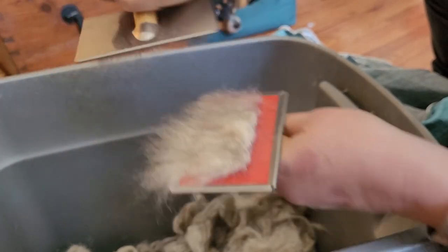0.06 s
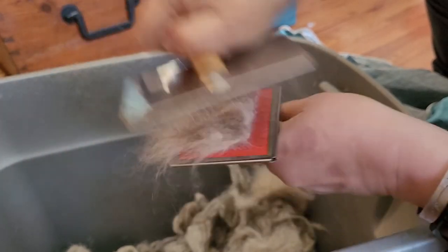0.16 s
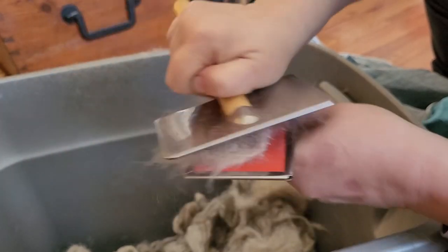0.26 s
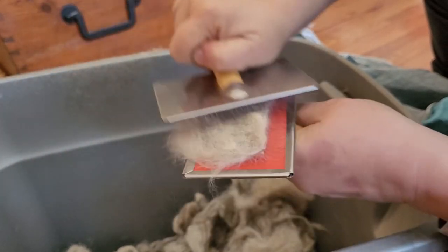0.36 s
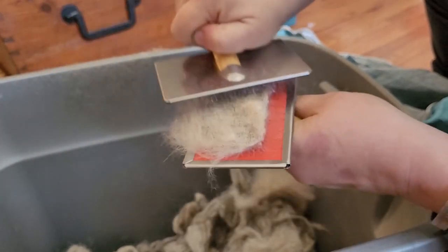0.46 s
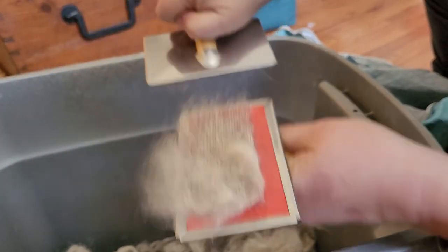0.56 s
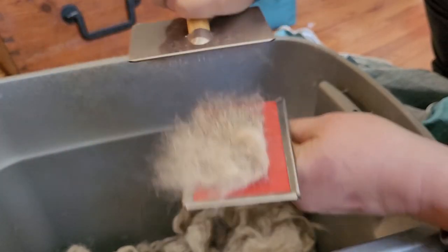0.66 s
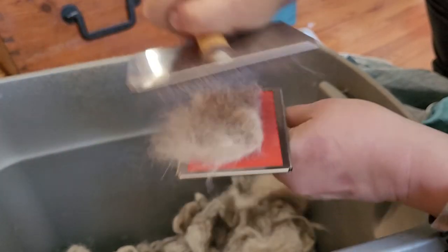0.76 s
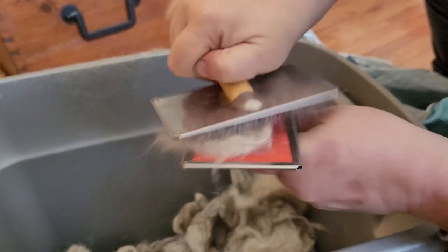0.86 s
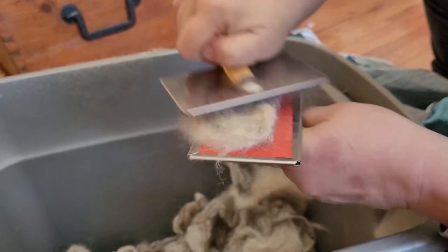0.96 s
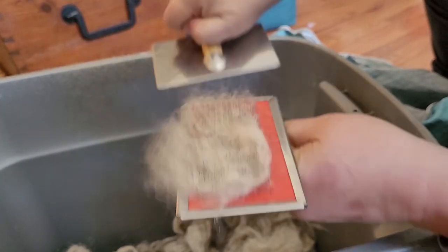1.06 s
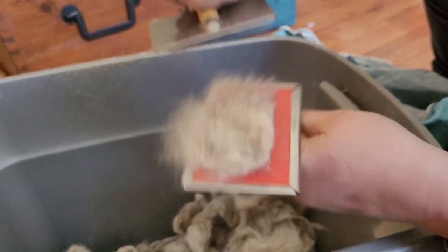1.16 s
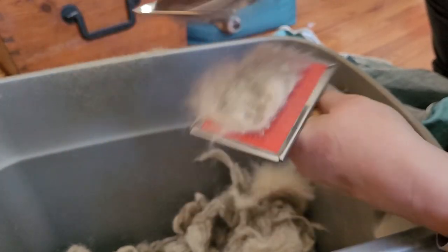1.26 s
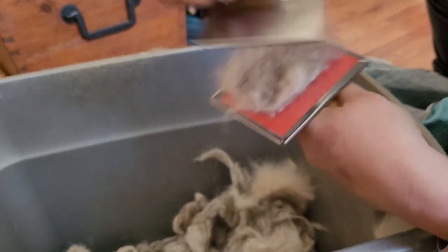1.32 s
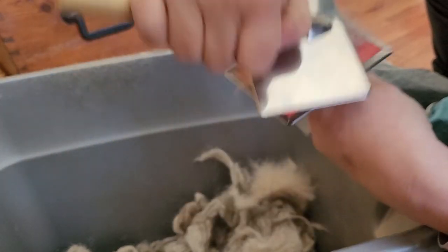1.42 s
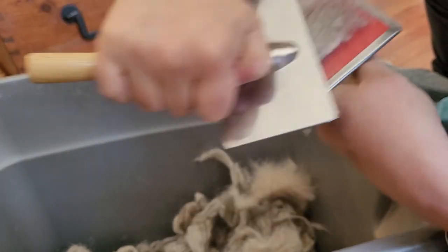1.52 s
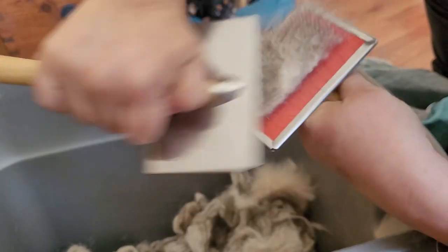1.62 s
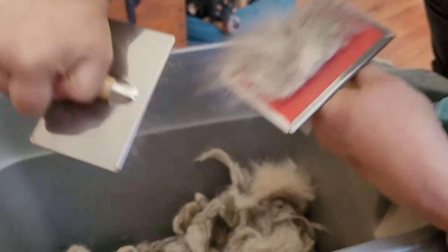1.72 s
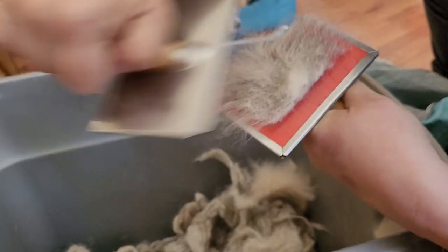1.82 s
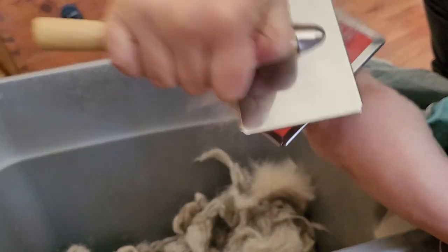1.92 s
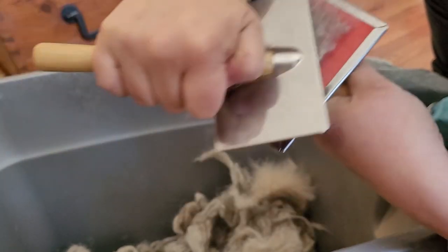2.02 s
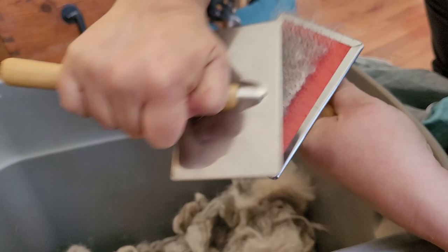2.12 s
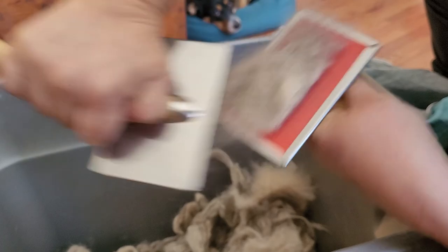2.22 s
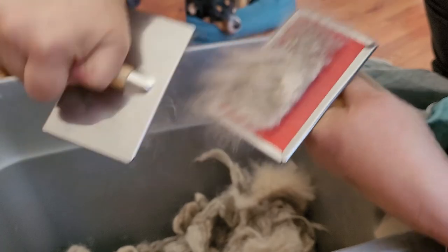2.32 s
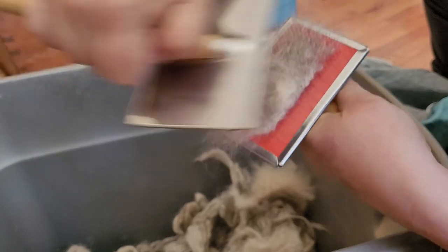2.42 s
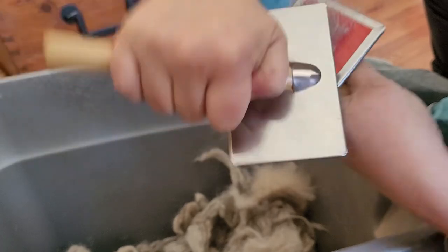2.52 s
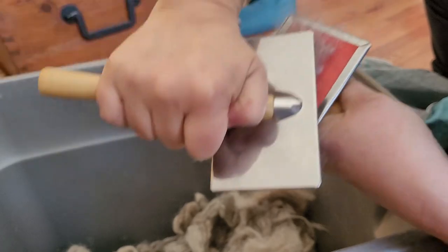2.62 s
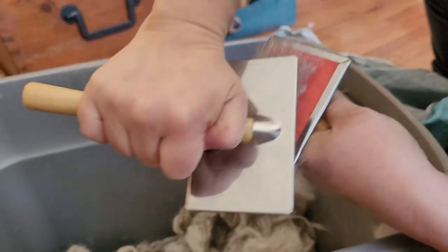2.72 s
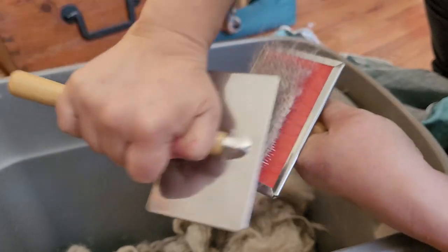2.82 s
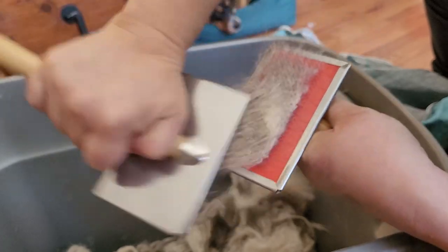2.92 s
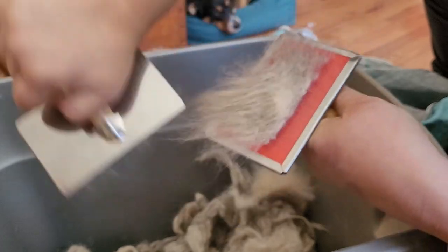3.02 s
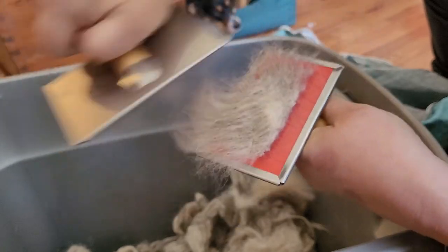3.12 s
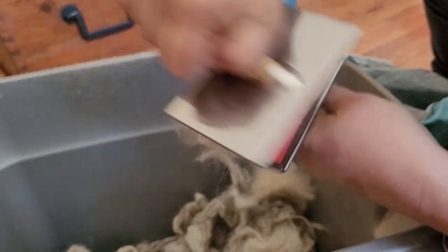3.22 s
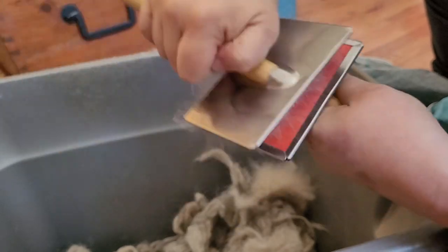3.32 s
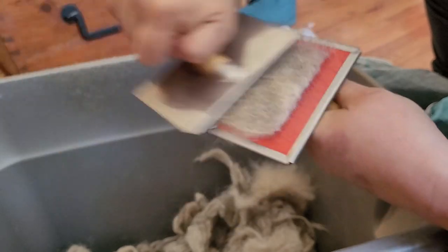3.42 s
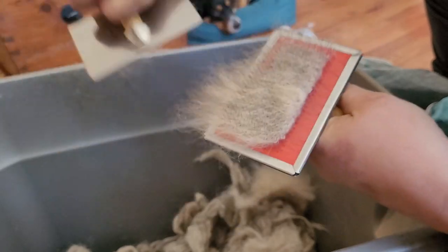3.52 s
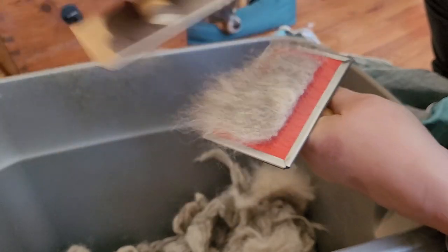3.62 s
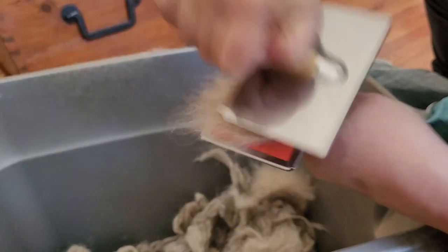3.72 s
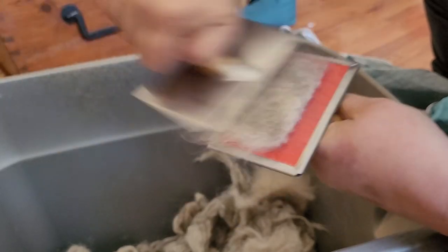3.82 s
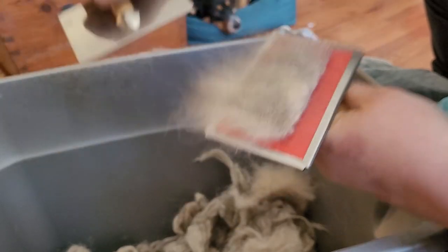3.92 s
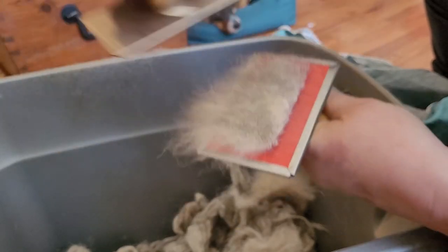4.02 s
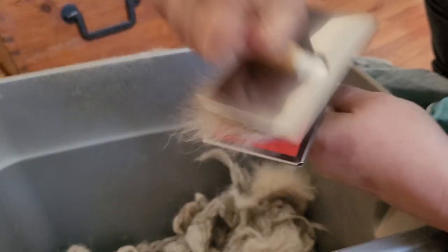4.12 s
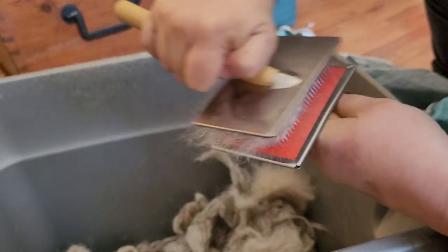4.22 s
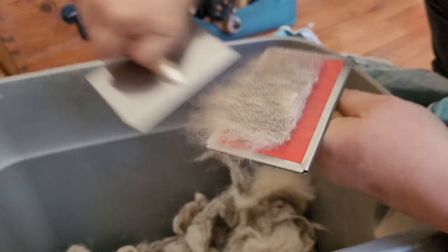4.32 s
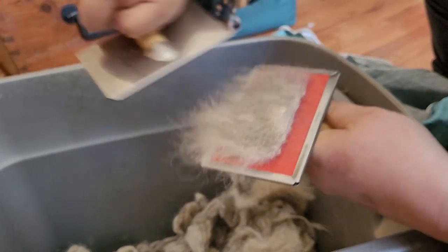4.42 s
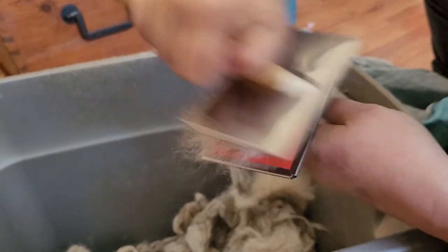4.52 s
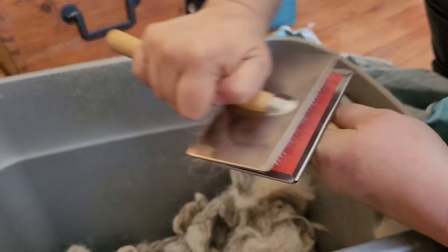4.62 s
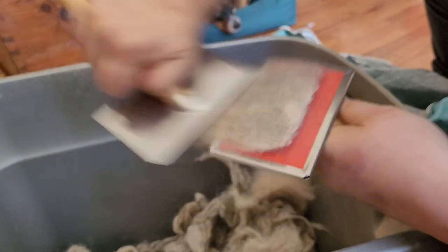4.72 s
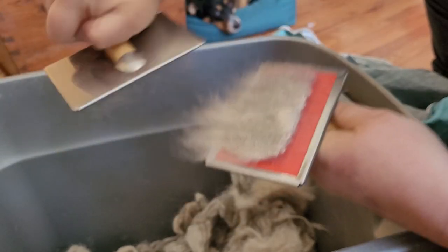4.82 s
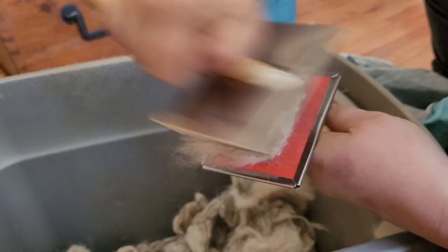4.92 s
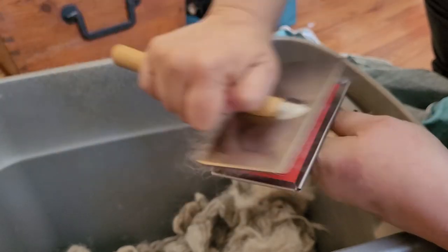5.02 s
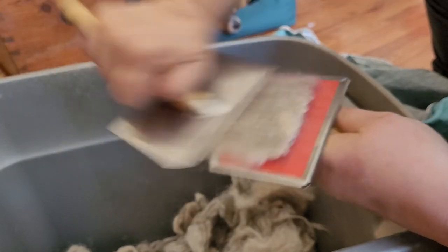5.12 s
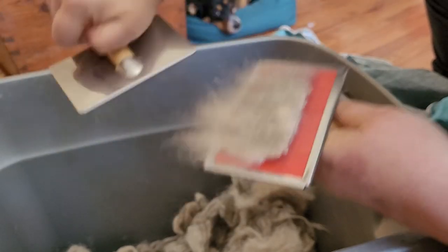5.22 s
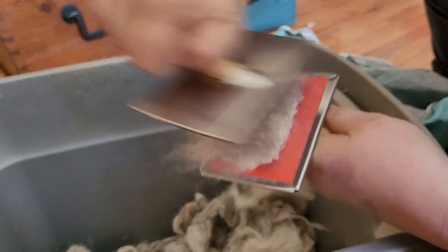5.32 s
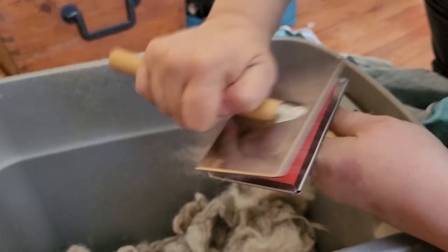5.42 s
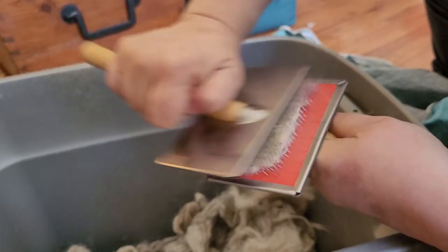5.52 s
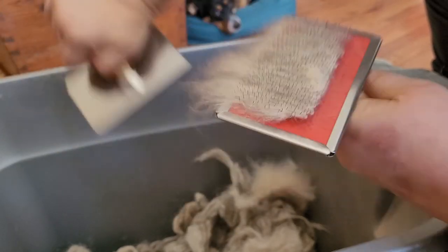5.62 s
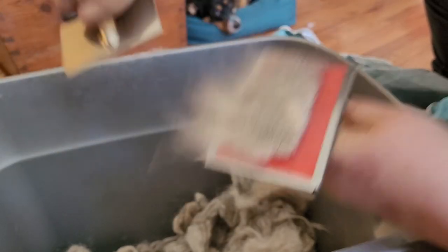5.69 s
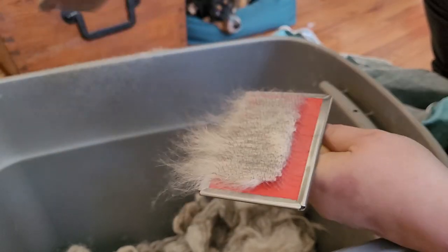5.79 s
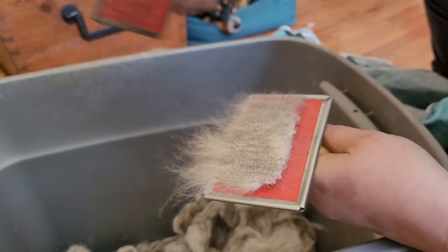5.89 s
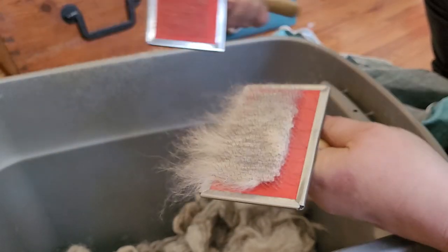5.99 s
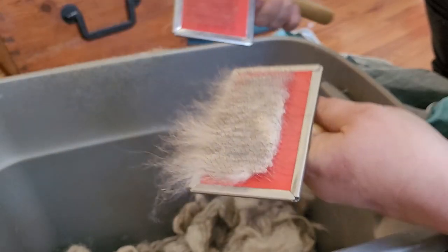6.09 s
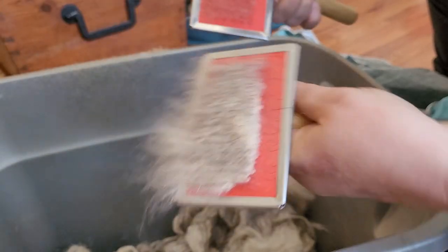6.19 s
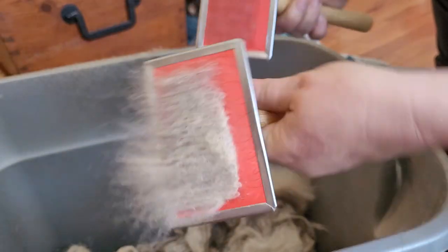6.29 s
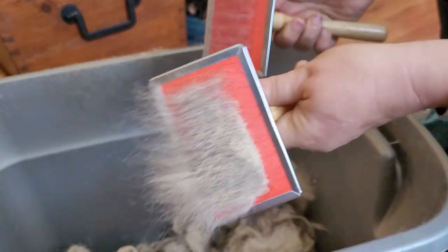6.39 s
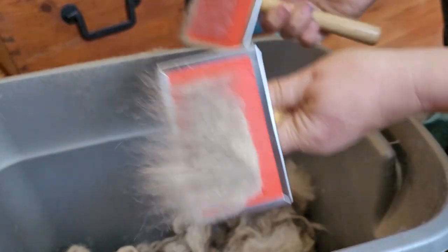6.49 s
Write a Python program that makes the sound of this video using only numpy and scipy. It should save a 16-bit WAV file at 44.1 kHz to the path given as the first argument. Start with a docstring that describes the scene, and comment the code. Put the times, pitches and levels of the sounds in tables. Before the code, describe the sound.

Two wire-toothed hand carders comb fur close to the microphone in a small, quiet room. About eleven strokes follow one another, each a light tap, a scratchy rasp and a bright flick as the teeth pull free. Early on, a plastic tub is bumped and booms briefly. Later strokes are quicker, some landing with a soft thud. After they stop come faint knocks, a soft palm rub and a few tiny wire pings.

```python
"""Two wire-toothed hand carders comb a tuft of fur over a plastic tub in a small, quiet room.
From 0.2 s come eleven strokes, the first catching halfway: the upper carder taps down, rasps through
the lower one, flicks free. The tub is bumped at 1.4 s and booms. After 3 s the hardest landings thud
in the wooden handles. The strokes end at 5.6 s; two faint knocks on the tub follow, a palm slides
on a handle, and single wires ping as the carders' edges graze each other."""
import sys
import numpy as np
from scipy import signal
from scipy.fft import rfft, irfft, next_fast_len
from scipy.io import wavfile
from scipy.ndimage import uniform_filter1d, map_coordinates

SR = 44100
rng = np.random.default_rng(int(sys.argv[2]) if len(sys.argv) > 2 else 0)


def materialize(psi):
    """Save the field psi as 16-bit PCM at rate SR to the path in sys.argv[1].

    A 1-D psi becomes a single channel; in a 2-D psi each row is a channel.
    """
    bounded = np.clip(np.atleast_2d(psi).T, -1, 1)
    quanta = np.round(bounded * 32767).astype(np.int16)
    wavfile.write(sys.argv[1], SR, quanta)


N = 288855
TIME = np.arange(N) / SR


def amp(db):
    """Decibels to gain."""
    return 10 ** (np.asarray(db) / 20)


def unit(x):
    """Scale to rms 1."""
    return x / np.sqrt(np.mean(x ** 2) + 1e-20)


def along(points, hz):
    """Read a curve of (Hz, value) points on a log frequency axis."""
    f, v = np.transpose(points)
    return np.interp(np.log(hz + 1), np.log(f + 1), v)


def lifts(modes, hz):
    """Bell EQ in dB from (centre Hz, width Hz, lift dB) rows."""
    return sum(db / (1 + (2 * (hz - centre) / width) ** 2) for centre, width, db in modes)


def filtered(x, response):
    """EQ x with a gain given as a function of frequency."""
    m = next_fast_len(x.shape[-1] + 8192)
    return irfft(rfft(x, m) * response(np.fft.rfftfreq(m, 1 / SR)), m)[..., :x.shape[-1]]


def ring(x, colour, modes=(), size=4096):
    """Play stereo x through a causal body of unit energy with this (Hz, dB) colour and these resonances."""
    hz = np.fft.rfftfreq(size, 1 / SR)
    cepstrum = irfft(np.log(amp(along(colour, hz) + lifts(modes, hz))))
    body = irfft(np.exp(rfft(2 * cepstrum * (np.arange(size) < size // 2))))
    return signal.oaconvolve(x, body[None] / np.linalg.norm(body), axes=1)[:, :x.shape[1]]


def ports(x, sides):
    """Pan each frequency between the left and right microphone ports."""
    def gains(hz):
        pair = amp(np.outer([.5, -.5], along(sides, hz)))
        return pair / np.sqrt(np.mean(pair ** 2, axis=0))
    return filtered(x, gains)


def add(track, s, sound):
    """Mix a sound into a track at s seconds."""
    rest = track[:, round(s * SR):]
    rest[:, :sound.shape[-1]] += sound[..., :rest.shape[1]]


def wobble(rate):
    """A smooth random curve with rate knots a second."""
    return map_coordinates(rng.standard_normal(int(N * rate / SR) + 4), [TIME * rate], order=2)


def patches(shape, bins, frames):
    """Random patches of rms 1, smooth over frequency and time."""
    across_bins = uniform_filter1d(rng.standard_normal(shape), bins, axis=0)
    return unit(uniform_filter1d(across_bins, frames, axis=1))


def swell(t, spread):
    """A peaked rise and fall around t = 0."""
    return np.exp(-np.abs(t / (2 * spread)) ** 1.66)


def swells(rows):
    """An envelope from (peak time s, dB, spread s) rows."""
    return sum(amp(db) * swell(TIME - s, spread) for s, db, spread in rows)


def struck(modes, t):
    """Decaying sines from (Hz, dB, t60 s) rows."""
    return sum(amp(db - 60 * t / t60) * np.sin(2 * np.pi * hz * t) for hz, db, t60 in modes)


def plucks(level, rate, scatter_db, lead_ms, width_ms):
    """Tiny random slips, up to rate a second; a harder pull frees more of them and makes each louder."""
    chance = np.clip(rate / SR * (level / level.max()) ** .4, 1e-6, 1)
    luck, size, place = rng.random(N), rng.standard_normal(N), rng.standard_normal(N)
    at = np.flatnonzero(luck < chance)
    strength = unit(amp(scatter_db * np.clip(size, -2, 2)))
    push = (strength * rng.choice([-1, 1], N) * level / np.sqrt(chance))[at]
    # each slip happens at its own spot, so it reaches the right port with its own delay
    delay = np.round((lead_ms + width_ms * place[at]) * SR / 1000).astype(int)
    late = np.clip(at + delay, 0, N - 1)
    return np.array([np.bincount(at, push, N), np.bincount(late, push, N)])


def crack(t60, rattle, lead_samples=3, size=2048):
    """One contact: a sharp push, first at the left port, and a short rattle."""
    burst = rng.standard_normal((2, size)) * amp(-60 * np.arange(size) / SR / t60)
    burst *= rattle / np.linalg.norm(burst, axis=1, keepdims=True)
    burst[[0, 1], [0, lead_samples]] += 1
    return burst / np.hypot(1, rattle)


# Room tone EQ. Each row: frequency in Hz, relative level in dB.
AIR_EQ = [(20, -18), (60, -9), (150, -8.5), (195, -12.5), (260, -6), (370, -10), (430, -3.5), (600, -9.5),
          (1350, -17.5), (1800, -25), (2300, -29.5), (3700, -35.5), (9000, -43), (16000, -46)]
# Hum and hiss bands. Each row: centre in Hz, width in Hz, lift in dB.
HUM_BANDS = [(160.8, 11, 10.5), (298, 24, 6), (430.8, 6.1, 10.5), (454.3, 4.8, 9), (528.3, 13, 8),
             (2760, 650, 7), (4740, 700, 4), (7270, 1230, 8.5), (11300, 1700, 11.5)]
# Stereo width of the air. Each row: frequency in Hz, left-right likeness (1 is mono).
AIR_LIKENESS = [(60, 0.82), (400, 0.85), (900, 0.31), (2000, 0), (8000, 0.021)]
# Pan of the air. Each row: frequency in Hz, left minus right in dB.
AIR_PAN = [(60, -1.5), (400, -1), (1300, 0), (2200, -1), (2900, 13), (3800, 2), (6000, 1.5), (7300, -2.5),
           (9000, -9), (11300, -11), (13500, -2), (16000, 7)]


def room_tone():
    """Room air with a low hum, nearly mono in the bass; its colour and level drift a little."""
    def mid_side_eq(hz):
        width = np.arccos(np.clip(along(AIR_LIKENESS, hz), -1, 1)) / 2
        return amp(along(AIR_EQ, hz) + lifts(HUM_BANDS, hz)) * [np.cos(width), np.sin(width)]
    spectrum = signal.stft(rng.standard_normal((2, N)), nperseg=1024)[2]
    drift_db = patches(spectrum.shape[1:], bins=8, frames=9)
    air = signal.istft(spectrum * amp(drift_db), nperseg=1024)[1][:, :N]
    mid, side = filtered(air, mid_side_eq)
    level = amp(-54.5 + 0.31 * wobble(7))
    return ports(level * unit(np.array([mid + side, mid - side])), AIR_PAN)


# The room's short decay. Each row: frequency in Hz, t60 in seconds.
ROOM_DECAY = [(200, 0.19), (1500, 0.17), (5000, 0.17), (15000, 0.12)]


def room_reverb(x, wet_db):
    """The small room answers, with a fresh tail every third of a second for the moving hands."""
    wet, block = np.zeros((2, N)), SR // 3
    for start in range(0, N, block):
        hz, t, noise = signal.stft(rng.standard_normal((2, block)), SR, nperseg=256)
        tail = signal.istft(noise * amp(-60 * t / along(ROOM_DECAY, hz)[:, None]), SR, nperseg=256)[1]
        tail /= np.linalg.norm(tail[0])
        add(wet, start / SR + .003, signal.fftconvolve(x[:, start:start + block], tail, axes=1))
    return x + amp(wet_db) * wet


# Palm moves. Each row: peak time in seconds, level in dB, spread in seconds.
PALM_RUBS = [(1.19, -72, 0.014), (1.42, -69, .04), (1.85, -69.5, 0.049), (3.64, -70, 0.03),
             (5.29, -67, 0.03), (5.9, -64.5, .04), (6.065, -59, 0.034), (6.29, -63, 0.045),
             (6.54, -67, 0.021)]
# Skin on wood. Each row: frequency in Hz, relative level in dB.
SKIN_EQ = [(400, -4), (1500, -10), (3500, -3), (7000, 1), (9000, -8), (12000, 4), (16000, -12)]
# Pan of the palm. Each row: frequency in Hz, left minus right in dB.
PALM_PAN = [(1000, 2), (3000, -6), (5000, -6.5), (8000, -15), (11500, -23), (15000, -10.5)]


def palm():
    """A palm slides on the wooden handle: a soft, grainy rub with its treble off to the right."""
    slips = plucks(swells(PALM_RUBS), rate=9000, scatter_db=8, lead_ms=0, width_ms=.1)
    return ports(ring(slips, SKIN_EQ), PALM_PAN)


# Wire pings. Each row: start in seconds, level in dB, click trim in dB.
WIRE_PINGS = [(6.238, -57, 11.5), (6.265, -47, -5), (6.282, -57, 7), (6.298, -62, 8), (6.314, -57.5, 10),
              (6.335, -51, 6), (6.382, -50, -7), (6.464, -55, -14), (6.522, -58.5, 17)]
# One wire's partials. Each row: frequency in Hz, relative level in dB, t60 in seconds.
WIRE_MODES = [(4587, -22, .05), (5770, -16, 0.038), (6500, -16, 0.063), (12600, -18, .08),
              (14800, -0.5, 0.073)]


def wire_pings():
    """Grazing edges pluck single wires, right of centre: each clicks and rings at its own tuning."""
    wires, clicks, t = np.zeros((2, N)), np.zeros((2, N)), np.arange(SR // 4) / SR
    for s, db, click_db in WIRE_PINGS:
        for hz, mode_db, t60 in WIRE_MODES:
            left, right, detune = rng.standard_normal(3)
            envelope = amp(db + mode_db + 3 * np.array([[left], [right]]) - 60 * t / t60)
            add(wires, s, envelope * np.sin(2 * np.pi * hz * (1 + 0.0048 * detune) * t))
        add(clicks, s, amp(db + click_db + 22) * crack(t60=0.009, rattle=5.1))
    clicks = ring(clicks, colour=[(2500, -15), (4500, -0.5), (9000, -13), (15000, -4.5)],
                  modes=[(5940, 310, 15), (12300, 500, 11)])
    return (wires + clicks) * amp([[-2.5], [2.5]])


# Hits on the tub. Each row: start in seconds, relative knock level in dB, boom level in dB.
TUB_KNOCKS = [(1.3538, -23, -63), (1.3565, -14, -20.5), (5.792, -32.5, -49), (5.856, -31, -61)]
# The tub's wall. Each row: frequency in Hz, relative level in dB, t60 in seconds.
TUB_MODES = [(121, -20, 0.23), (221, -5, 0.12), (244, 8.5, 0.044), (400, -25, 0.14), (572, -12, 0.074)]
# The knock's tone. Each row: frequency in Hz, relative level in dB.
KNOCK_EQ = [(100, 0), (550, 5.5), (850, -2.5), (1200, 5.5), (1800, -6), (2800, -16), (4000, -32),
            (7000, -32), (16000, -56)]
# A carder's steel back, ringing in knocks, taps and teeth. Each row: centre in Hz, width in Hz, lift in dB.
STEEL_BACK = [(1185, 73, 4.5), (1660, 30, 0), (1950, 150, 3.5), (2269, 39, 4), (2855, 23, 8),
              (3090, 27, 2.5), (4790, 130, 3), (5200, 78, 4.5)]


def tub():
    """A knock on the plastic; its wall booms a moment later and shudders to rest."""
    blows, boom, t = np.zeros((2, N)), np.zeros((2, N)), np.arange(SR // 2) / SR
    shudder_eq = [(20, -9), (45, 5), (110, -5.5), (300, -5.5), (900, -50)]
    wall, attack = struck(TUB_MODES, t), 1 - np.exp(-t / 0.0069)
    for s, db, boom_db in TUB_KNOCKS:
        add(blows, s, amp(db + 12) * crack(t60=0.076, rattle=1.5))
        rumble = unit(filtered(rng.standard_normal(len(t)), lambda hz: amp(along(shudder_eq, hz))))
        shudder = amp(-24.5 - 60 * t / 0.79) * rumble
        add(boom, s + 0.00923, amp(boom_db) * (wall + shudder) * attack)
    return ring(blows, KNOCK_EQ, STEEL_BACK) + boom


# Hard landings. Each row: start in seconds, level in dB.
LANDINGS = [(3.282, -48), (3.773, -36), (4.167, -45.5), (5.008, -44)]
# The handles' low end. Each row: frequency in Hz, relative level in dB, t60 in seconds.
HANDLE_MODES = [(76, -11, 0.21), (136, -6, .15), (249, 4, 0.092)]


def handle_thuds():
    """Handles and wrists give under a hard landing of the upper carder."""
    out, t = np.zeros((2, N)), np.arange(SR // 4) / SR
    thud = struck(HANDLE_MODES, t) * (1 - np.exp(-t / 0.0027))
    for s, db in LANDINGS:
        add(out, s, amp(db) * thud)
    return out


# Hair pulls. Each row: peak time in seconds, level in dB, spread in seconds.
HAIR_PULLS = [(1.75, -66, 0.031), (3.53, -61.5, 0.03), (4.84, -61, 0.035), (5.24, -61, 0.037)]
# The fur's airy tone. Each row: frequency in Hz, relative level in dB.
FUR_EQ = [(1000, -6), (3000, -8), (4200, -7), (5100, -6.5), (6200, -17), (9000, -17), (12000, -14.5),
          (16000, -19.5)]


def fur_wisps():
    """Long hairs pull apart after some strokes with a faint hiss."""
    slips = plucks(swells(HAIR_PULLS), rate=12000, scatter_db=1, lead_ms=0.056, width_ms=0.067)
    return ring(slips, FUR_EQ, modes=[(5100, 540, 4)])


# The frames clack or catch an edge. Each row: time in seconds, relative level in dB,
# relative treble in dB, lead of the first corner in seconds.
FRAME_TAPS = [(0.2309, -21.5, -14, 0.0035), (0.4308, -17, -29, .002), (0.4805, -20.5, -10, 0.0019),
              (0.537, -18.5, 3.5, .002), (0.8611, -21, -17.5, 0.0042), (1.4842, -26.5, -13, 0.0019),
              (1.9788, -19.5, -13.5, .0025), (2.5426, -23.5, -10.5, 0.0041), (2.607, -36, -7, 0.00091),
              (2.6842, -26.5, -13, .002), (2.712, -25, -17, 0.008), (3.2837, -17, -11, 0.0032),
              (3.2904, -23.5, -3, 0.0011), (3.4758, -5.5, 0, .001), (3.7738, -4, -14.5, 0.0077),
              (4.1759, -14.5, -8, .009), (4.5856, -24, -6.5, .0034), (4.612, -17, -9.5, 0.0022),
              (5.0085, -8.5, -15.5, 0.0094), (5.4051, -18.5, -12.5, 0.0087), (5.5973, -12, 3, 0.0022)]
# The clack's tone. Each row: frequency in Hz, relative level in dB.
TAP_EQ = [(80, -33), (250, -8.5), (700, -1.5), (1200, 0), (1900, 4.5), (3300, -6.5), (4500, -2.5),
          (6500, -8.5), (8700, -16), (11500, -10.5), (16000, -23.5)]


def frame_taps(corner_db=-7.5, graze_lead_s=.004):
    """The carders meet tips first, then a corner, then flat: teeth snap, and loose ones rattle on."""
    blows, t = np.zeros((2, N)), np.arange(SR // 20) / SR
    for s, db, treble_db, lead_s in FRAME_TAPS:
        shelf = lambda hz: amp((treble_db + 7.5) * hz ** 2 / (hz ** 2 + 5000 ** 2))
        for when, level_db in (s - lead_s, db + corner_db), (s, db):
            snap = crack(t60=.012, rattle=2.4)
            loose_teeth = amp(-9) * crack(t60=0.08, rattle=6.9)
            add(blows, when, amp(level_db + 10) * filtered(snap + loose_teeth, shelf))
        rise_s = lead_s + graze_lead_s
        graze = rng.standard_normal((2, len(t))) * swell(t - rise_s, rise_s / 2)
        add(blows, s - rise_s, amp(db - 31) * filtered(graze, shelf))
    return ring(blows, TAP_EQ, STEEL_BACK)


# Pulls of the upper carder. Each row: start, time to full grip, sink-in time and length in seconds;
# relative levels of skim, grip, end and flick in dB; bite at grip and at end in dB.
# Bite is the balance of wire over pad: how far the teeth mesh instead of riding on the fur.
# The first two rows are one stroke that catches halfway.
PULLS = [ (0.24, 0.12, 0.043, 0.18, -46.5, -26.5, -32, -50, 5.5, -1.5),
         (0.454, 0.043, 0.039, 0.081, -49, -33, -30, -27.5, -1.5, 0),
         (0.867, 0.13, 0.13, 0.17, -53.5, -30, -30.5, -23.5, -6, 1.5),
         (1.517, 0.13, 0.085, .16, -44.5, -30.5, -31, -23.5, -7, -10),
         (1.987, 0.17, 0.096, 0.26, -59, -30, -34, -26, -3.5, -3),
         (2.542, 0.25, 0.094, .44, -56.5, -32.5, -35.5, -34, -2, -9),
         (3.293, 0.054, 0.042, .168, -52.5, -31, -28.5, -23, 0, 4),
         (3.778, .036, 0.03, .076, -42.5, -21.5, -26, -20.5, 0.5, 4),
         (4.179, 0.044, 0.034, 0.14, -52, -29.5, -27, -20.5, 1, -1.5),
         (4.592, 0.043, 0.023, 0.14, -48, -26, -27.5, -20, 2.5, -.5),
         (5.013, 0.037, 0.03, 0.13, -43, -26, -27, -19.5, 4.5, -2.5),
         (5.413, 0.041, 0.027, 0.18, -59, -32.5, -24, -20, -0.5, 6.5), ]


def stroke_envelopes(skim_bite_db=-2.5, skim_attack_s=0.0067, even_pull_db=-32, release_s=.022):
    """Each pull skims, sinks in, drags and lets go: gains of skim, drag and flick, mesh angle, time left."""
    skim, drag, bite, flick, left_s = np.zeros((5, N))
    for start, grip_s, sink_s, length_s, *levels in PULLS:
        skim_db, grip_db, end_db, flick_db, grip_bite_db, end_bite_db = levels
        span = slice(*np.searchsorted(TIME, [start, start + length_s + .06]))
        t = TIME[span] - start
        travel = np.clip((t - grip_s) / (length_s - grip_s), 0, 1)
        sink_db = 20.5 * np.maximum((grip_s - t) / sink_s, 0) ** 1.31  # the rasp climbs as teeth sink in
        # pulls harder than even_pull_db ease off midway, as the fur gives
        sag_db = 0.23 * (max(grip_db, end_db) - even_pull_db) * np.sin(np.pi * travel) ** 2
        release_db = 14 * np.maximum((t - length_s) / release_s, 0) ** 2  # the carders part
        pull = amp(grip_db + (end_db - grip_db) * travel - sink_db - sag_db - release_db)
        tips = amp(skim_db) * np.minimum(t / skim_attack_s, 1) * (t < grip_s)
        bite_db = grip_bite_db + (end_bite_db - grip_bite_db) * travel
        skim[span] += tips
        drag[span] += np.hypot(pull, tips)
        bite[span] = bite_db + (skim_bite_db - bite_db) * tips / (tips + pull + 1e-12)
        flick[span] += amp(flick_db) * swell(t - length_s, spread=.0065)  # the last rows spring free
        left_s[span] = length_s - t
    return skim, drag, flick, np.arctan(amp(bite)), left_s


def locked_resonance(x, mesh, left_s):
    """A resonance of the locked carders: high while the teeth grip, sinking as they slide apart."""
    hz, t, spectrum = signal.stft(x, SR, nperseg=512)
    grip = np.clip(np.interp(t, TIME, left_s) / 0.092, 0, 1) * np.sin(np.interp(t, TIME, mesh)) ** 2
    centre_hz = 1560 * 2 ** (0.9 * grip)
    hump_db = lifts([(centre_hz, 550, 3)], hz[:, None]) - .7
    # the plates' colour also shifts by chance as the contact patch moves
    shift_db = 1.8 * patches(spectrum.shape[1:], bins=4, frames=12)
    return signal.istft(spectrum * amp(hump_db + shift_db), SR, nperseg=512)[1][:, :N]


# Tones of the cushioned pad, the wire teeth and their flick. Each row: frequency in Hz, relative level in dB.
PAD_EQ = [(100, -23.5), (260, -9.5), (500, -10), (880, -11), (1100, -2.5), (1450, -4), (1850, -2),
          (2100, -14.5), (3300, -13.5), (4500, -7), (6500, -21.5), (8700, -38), (12000, -23),
          (16000, -21.5)]
TEETH_EQ = [(200, -22.5), (1000, -6), (1900, 0.5), (2700, 2.5), (3400, -4), (4500, 2.5), (5500, -6),
            (7200, -8), (8700, -19.5), (10000, -15), (11700, -6), (16000, -12.5)]
FLICK_EQ = [(200, -21), (900, -3.5), (2000, -7), (3300, -3), (5000, 5), (7000, 0), (8700, -8.5), (11500, 3),
            (16000, 3)]
# Resonances of the fur-laden pad. Each row: centre in Hz, width in Hz, lift in dB.
PAD_MODES = [(1170, 146, -0.5), (1510, 170, 3), (1630, 34, 3.5), (1890, 130, 1.5), (2490, 170, 2.5),
             (4030, 670, 0.5), (4700, 640, -1)]


def carding():
    """Dragged teeth rasp through the pad and sing on each other, then flick free in a bright spray."""
    skim, drag, flick, mesh, left_s = stroke_envelopes()
    drag = drag * amp(1.1 * wobble(110))  # the fur catches and lets go
    on_pad, on_wire = drag * np.cos(mesh), drag * np.sin(mesh)
    pad = plucks(amp(-0.7) * on_pad, rate=9000, scatter_db=3, lead_ms=0.016, width_ms=.06)
    teeth = plucks(amp(2.5) * on_wire, rate=12000, scatter_db=3, lead_ms=.08, width_ms=.07)
    rasp = ring(pad, PAD_EQ, PAD_MODES) + ring(teeth, TEETH_EQ, STEEL_BACK)
    springs = plucks(amp(-1) * flick, rate=8900, scatter_db=1.5, lead_ms=0.065, width_ms=.08)
    spray = ring(springs, FLICK_EQ, STEEL_BACK)
    wisps = fur_wisps()
    # deeply meshed teeth also shake the wooden handles
    strain = drag * (drag / drag.max()) ** 0.35 * np.sin(mesh) ** 2
    jolts = plucks(amp(-16.5) * strain, rate=2500, scatter_db=-1, lead_ms=0, width_ms=.1)
    judder = ring(jolts, [(20, -21), (70, -2), (170, -12), (270, 7.5), (400, -5), (900, -33), (3000, -53)])
    # now and then one tooth hooks another and lets go with a louder tick
    snags = plucks(amp(-10) * drag, rate=170, scatter_db=4, lead_ms=0.083, width_ms=0.039)
    # skimming tips tick against each other one by one
    tips = plucks(amp(-3.5) * skim, rate=90, scatter_db=1.5, lead_ms=0.07, width_ms=0.046)
    ticks = ring(snags + tips, TAP_EQ, STEEL_BACK)
    return locked_resonance(rasp, mesh, left_s) + ticks + spray + wisps + judder


# Pan of the carders. Each row: frequency in Hz, left minus right in dB.
CARDER_PAN = [(250, .5), (500, -5), (950, 11.5), (1500, -1), (2200, 0.5), (3100, 4.5), (3600, 2.5),
              (4300, 2.5), (6000, 3), (9000, -1), (11500, -1.5), (12800, 1.5), (13700, 5), (16000, 25)]


def scene():
    """The carders work close up, a different colour in each channel, over quiet room tone."""
    carders = ports(carding() + frame_taps(), CARDER_PAN)
    foley = carders + handle_thuds() + tub() + wire_pings() + palm()
    return room_reverb(foley, wet_db=-13.5) + room_tone()


def record(dry, ceiling=.75, top_hz=16000):
    """A soft clip rounds off the sharpest peaks, then a steep low-pass cuts the very top."""
    rounded = dry / (1 + (dry / ceiling) ** 4) ** .25
    edge_hz = [top_hz - 250, top_hz, top_hz + 700]
    return filtered(rounded, lambda hz: amp(np.interp(hz, edge_hz, [0, -8, -100])))


dry = scene()
out = record(dry)
materialize(out)
```